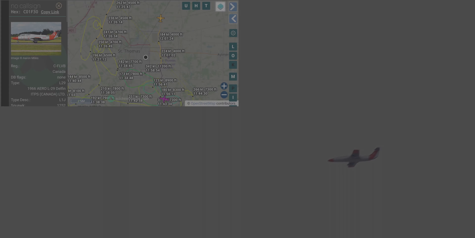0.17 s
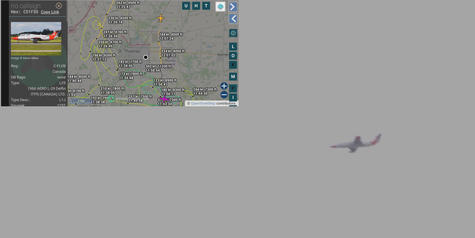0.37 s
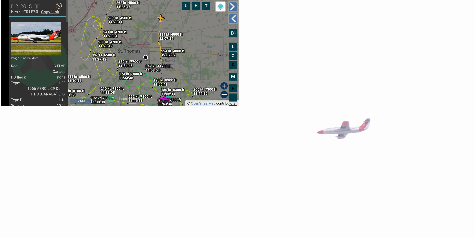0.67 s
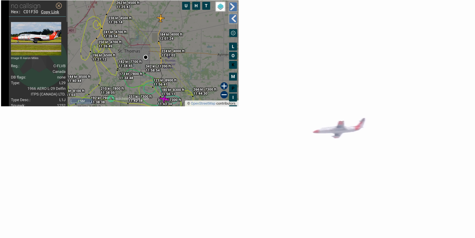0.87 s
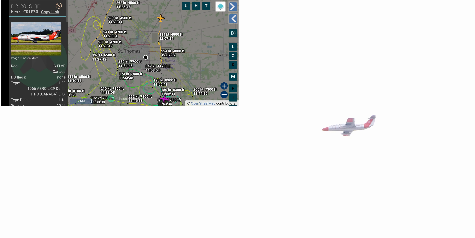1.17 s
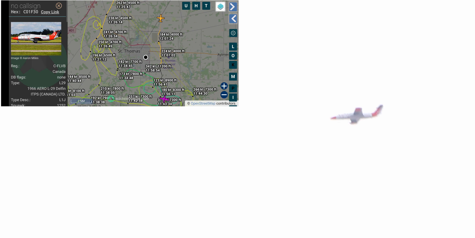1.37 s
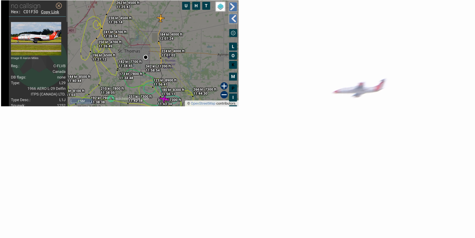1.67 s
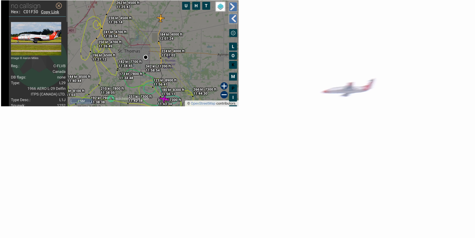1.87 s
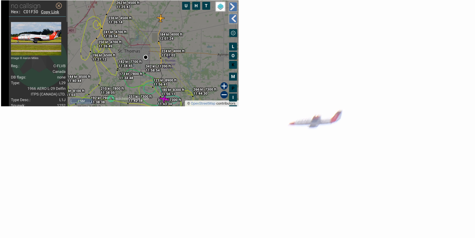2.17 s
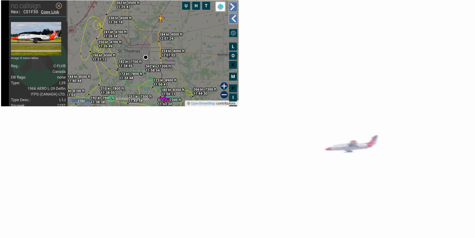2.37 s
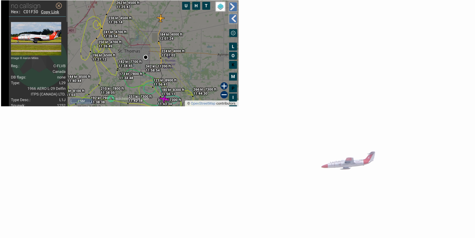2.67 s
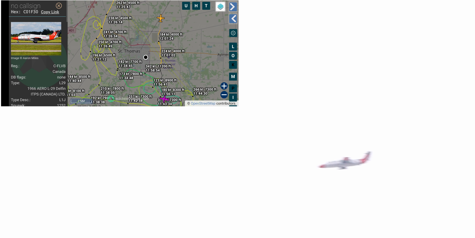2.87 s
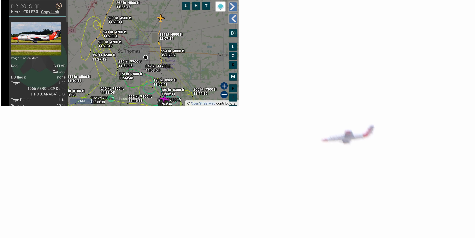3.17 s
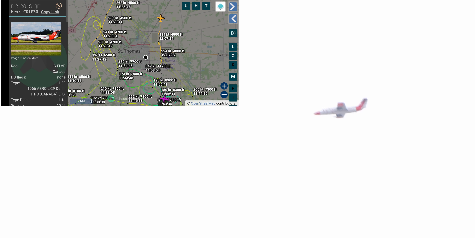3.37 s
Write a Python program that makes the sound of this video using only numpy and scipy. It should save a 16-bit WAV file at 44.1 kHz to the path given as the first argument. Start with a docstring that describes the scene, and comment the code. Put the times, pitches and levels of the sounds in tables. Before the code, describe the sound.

The low drone of a faraway propeller airliner fades in, its dull roar rolling through the open air over a light wind rumble. The hand-held camera ticks faintly up close, and a few faint high chirps sound in the distance.

```python
"""Outdoors, from the microphone of a hand-held camera. The sound fades in on a distant propeller
airliner: its blades drone, sinking slowly in pitch, over an exhaust and airframe roar that swells and
fades in the moving air. Light wind, hiss and a faint rustle lie beneath; whooshes roll through the roar.
From 0.4 s the camera's shell ticks faintly under the hand, right at the microphone. From 0.8 s a few
weak high chirps sound far off. Near the end the whooshes narrow into brief howls."""
import sys
import numpy as np
from scipy import signal
from scipy.io import wavfile
from scipy.ndimage import uniform_filter1d

SR = 44100
rng = np.random.default_rng(int(sys.argv[2]) if len(sys.argv) > 2 else 0)


def master_out(mix):
    """Clip the mix to full scale and print it as 16-bit PCM to the path in sys.argv[1]."""
    frames = np.transpose(np.atleast_2d(mix))
    ceiling = np.clip(frames, -1, 1)
    pcm = np.round(ceiling * 32767).astype(np.int16)
    wavfile.write(sys.argv[1], SR, pcm)


N = 155232
TIME = np.arange(N) / SR

# blade-passing rate as it reaches the microphone: (time [s], rate [Hz])
BLADE_RATE = [(0, 82.48), (.5, 81.72), (1.2, 81.77), (2.0, 80.3), (2.75, 80.2), (3.25, 79.05),
              (3.52, 79.65)]
# the blade tone and its second and third harmonics: (time [s], rms level [dB])
BLADE_LEVEL = [(.3, -20.5), (.82, -18.5), (.97, -20), (1.1, -18), (1.7, -18.5), (2.35, -17.5), (2.56, -18),
               (2.68, -21.5), (2.85, -20.5), (2.94, -19.5), (3.28, -21), (3.52, -22)]
SECOND_LEVEL = [(.3, -34), (.85, -34), (1.15, -29.5), (1.3, -28.5), (1.76, -26), (2.12, -27.5),
                (2.2, -32.5), (2.35, -32), (2.58, -32.5), (2.78, -28), (3.52, -29)]
THIRD_LEVEL = [(.3, -30.5), (.6, -28), (.88, -32), (1.0, -30), (1.32, -41), (1.6, -26), (1.95, -31.5),
               (2.2, -38.5), (2.349, -27), (2.8, -38.5), (3.0, -27), (3.27, -26), (3.52, -28)]
# propeller overtones: (multiple of the shaft rate, rms level before swell and fading [dB])
OVERTONES = [(13, -36), (15, -43.5), (16, -50.5), (20, -42), (31, -50.5), (33, -51), (35, -48.5), (48, -54)]
# swells in the moving air, from bass to top: (time [s], gain [dB])
BASS_SWELL = [(.3, -4), (.83, -1), (.92, 3), (1.12, 0.5), (1.78, 4), (1.97, 1), (2.15, 2), (2.35, -8),
              (2.7, 3.5), (3.0, -1), (3.5, 5.5)]
LOW_MID_SWELL = [(.25, -2), (.5, 5), (1.15, 3), (1.38, -2.5), (1.55, 5), (1.78, -3.5), (2.05, 3),
                 (2.25, -1), (2.47, 4), (2.62, -4.5), (2.9, 1.5), (3.17, 2), (3.4, 8), (3.52, 7)]
MID_SWELL = [(.3, 6.5), (.62, -1), (.92, 3), (1.3, 0), (1.55, 7), (1.66, 1), (1.89, 7.5), (2.1, -3.5),
             (2.47, 4.5), (2.66, 1), (2.84, 6), (3.1, 4), (3.52, 3)]
TOP_SWELL = [(.35, 1.5), (0.519, -0.5), (.68, 2), (.85, -0.5), (1.0, -3.5), (1.22, 2), (1.37, -1.5),
             (1.56, 1.5), (1.72, -1.5), (2.28, -2.5), (2.45, 5), (2.62, -3), (2.82, 2.5), (3.1, -2.5),
             (3.22, 4), (3.52, -3)]
# where each of the four swells acts most, then where swelling ends: (frequency [Hz])
SWELL_HZ = [175, 370, 680, 1050, 1900]
# spectra of the distant roar, the wind, the hiss and the rustle: (frequency [Hz], relative density [dB])
ROAR_SPECTRUM = [(70, -3.5), (110, -9.5), (145, 8.5), (190, 4.5), (235, -2.5), (290, -4), (390, 0),
                 (510, -11), (690, -11), (850, -13), (1050, -17), (1300, -24.5), (1650, -34), (2300, -43.5),
                 (4000, -65)]
WIND_SPECTRUM = [(15, -5), (28, -5.5), (48, 1.5), (70, -3.5), (120, -9.5), (400, -42.5)]
HISS_SPECTRUM = [(300, 10), (1400, 9), (2500, -0.5), (5000, 1), (7500, 2.5), (10000, 1.5), (16000, 1)]
RUSTLE_SPECTRUM = [(1200, -3), (1500, 2.5), (2200, -7), (2800, -7.5), (3600, -7), (4500, -13), (7000, -24)]
# slow rise and fall of the hiss: (time [s], gain [dB])
HISS_SWELL = [(.3, 1.5), (1.6, 0.5), (2.3, 0.5), (2.85, 2.5), (3.15, 1.5), (3.45, -0.5)]
# the rustle before its flicker: (time [s], level [dB])
RUSTLE_LEVEL = [(.3, -57.5), (.55, -57.5), (1.2, -58), (1.55, -58.5), (2.2, -60), (3.1, -58), (3.48, -63)]
# likeness of the microphone's left and right channels: (frequency [Hz], correlation [0-1])
LIKENESS = [(25, .7), (70, 1), (160, 0.98), (500, 0.95), (900, 0.94), (1400, 0.53), (1900, 0),
            (16000, 0.027)]
# whooshes and howls in the roar:
# (time [s], length [s], start pitch [Hz], end pitch [Hz], crest rms level [dB], width [share of pitch])
WHOOSHES = [(0.127, 0.326, 986, 1030, -39, 0.19), (0.199, 0.32, 729, 620, -33.5, 0.25),
            (0.778, 0.26, 428.2, 250.7, -25, 0.21), (0.889, .13, 189.1, 168.4, -26.5, 0.29),
            (1.116, 0.234, 1037, 971, -41.5, 0.14), (2.223, 0.37, 673, 665, -31.5, 0.2),
            (2.72, 0.25, 700.2, 607.6, -30, 0.26), (3.225, 0.18, 380, 364.6, -23, 0.064),
            (3.366, .13, 395.4, 401.6, -22, 0.064), (3.342, 0.23, 679.5, 731, -37, 0.028)]
# handling ticks: (time [s], level at the tilt pivot [dB], tilt [dB/octave], tail against crack [dB])
TICKS = [(.390, -56, -11, -4), (.639, -41.5, 4, -6.5), (.646, -44.5, -6, 0.5), (.779, -56, 0, -12),
         (1.112, -53.5, -9, -1), (1.300, -55.5, -11, -0.5), (1.483, -45, -7, -16), (1.743, -45, 0.5, -8.5),
         (1.748, -46, -10, -2.5), (2.018, -56.5, -9.5, 2), (2.207, -55, -9, -4.5), (2.363, -55, -12, -2),
         (2.457, -52, -4, -6.5), (2.573, -51, -5, -9), (2.725, -54, -12.5, -3.5), (3.008, -51, -10, 0),
         (3.059, -53.5, -12, -3.5), (3.216, -55.5, -7, -2)]
# broad spectrum of the camera's shell: (frequency [Hz], relative density [dB])
SHELL_SPECTRUM = [(900, -4), (1650, 8.5), (2600, -10), (3800, 4.5), (5200, 4), (6300, -0.5), (8000, -1),
                  (10000, -12), (11600, -7.5), (15000, -10)]
# the shell's resonances: (frequency [Hz], relative level [dB])
SHELL_MODES = [(1610, -12.5), (3450, -14.5), (4010, -12), (5060, -11), (6500, -13.5), (7260, -7.5),
               (8190, -8.5), (11400, -13)]
# far chirps: (time [s], length [s], pitch [Hz], crest rms level [dB], pure tone [share of power])
CHIRPS = [(0.823, 0.024, 1452, -40.5, 0.46), (.955, 0.026, 3540, -56.5, .4),
          (1.026, 0.024, 3500, -56, 0.38), (1.093, 0.027, 1463, -40, .7), (1.196, 0.086, 3450, -54.5, 0.03),
          (1.63, 0.055, 3350, -59, 0.1), (2.449, 0.026, 3090, -58.5, .7)]


def from_db(db):
    """Decibels to gain."""
    return 10 ** (np.asarray(db) / 20)


def rms_one(x):
    """Scale to rms 1."""
    return x / np.sqrt(np.mean(x ** 2) + 1e-20)


def in_time(rows):
    """Read (time, value) rows at every sample."""
    return np.interp(TIME, *np.transpose(rows))


def at_hz(points, hz):
    """Read a spectrum on a log-frequency axis."""
    f, value = np.transpose(points)
    return np.interp(np.log(hz), np.log(f), value)


def arch(start, length):
    """A half-sine rise and fall."""
    return np.sin(np.pi * np.clip((TIME - start) / length, 0, 1))


def drift(rate_hz):
    """A slow random wander with spread 1."""
    hop, settle = 100, 2000
    pole = np.exp(-2 * np.pi * hop * rate_hz / SR)
    white = rng.standard_normal(N // hop + settle + 2)
    slow = signal.lfilter([1], [1, -2 * pole, pole * pole], white)[settle:]
    return np.interp(np.arange(N) / hop, np.arange(len(slow)), rms_one(slow - slow.mean()))


def even(x, window_s=0.1):
    """Hold a noise's power steady, keeping its fast flutter."""
    power = np.mean(x ** 2, axis=0)
    local_power = np.abs(uniform_filter1d(power, int(window_s * SR)))
    return x * np.sqrt(power.mean() / (local_power + 1e-20))


def stereo(mid, side, alike):
    """Mix two noises into left and right with correlation `alike`."""
    return np.sqrt(1 + alike) * mid + np.sqrt(1 - alike) * side * [[1], [-1]]


def noise_bands(spectrum):
    """Third-octave bands of stereo noise, as (Hz, band), whose powers add up to 1."""
    edges = 16 * 2 ** (np.arange(31) / 3)
    centres = np.sqrt(edges[1:] * edges[:-1])
    inside = (centres > spectrum[0][0]) & (centres < spectrum[-1][0])
    gains = from_db(at_hz(spectrum, centres)) * np.sqrt(centres) * inside
    for hz, low, high, gain in zip(centres, edges, edges[1:], gains / np.linalg.norm(gains)):
        white = rng.standard_normal((2, N))
        if gain > 0:
            mid, side = signal.sosfilt(signal.butter(2, [low, high], "band", fs=SR, output="sos"), white)
            alike = min(at_hz(LIKENESS, hz), .998)
            yield hz, gain * rms_one(stereo(mid, side, alike))


def narrow_noise(hz, width_hz):
    """Stereo noise around a steady or gliding centre; rms 1."""
    hz = hz * np.ones(N)
    white = rng.standard_normal((2, N)) + 1j * rng.standard_normal((2, N))
    mid, side = signal.sosfilt(signal.butter(2, width_hz / 2, fs=SR, output="sos"), white)
    pair = stereo(mid, side, at_hz(LIKENESS, hz.mean()))
    carrier = np.exp(2j * np.pi * np.cumsum(hz) / SR)
    return rms_one(np.real(pair * carrier))


def air_swell_db(hz):
    """How moving air on the way to the microphone raises and lowers the aircraft at one frequency."""
    curves = BASS_SWELL, LOW_MID_SWELL, MID_SWELL, TOP_SWELL
    shares = [np.interp(np.log(hz), np.log(SWELL_HZ), row) for row in np.eye(len(SWELL_HZ))]
    return sum(share * in_time(curve) for share, curve in zip(shares, curves))


def propellers(blades=4, left_over_right_db=2.07, fading_db=3, waver_hz=1.81):
    """Far off, passing blades make a tone with two strong harmonics; overtones waver on the way down."""
    rate = in_time(BLADE_RATE)
    angle = 2 * np.pi * np.cumsum(rate) / SR
    pan = from_db(np.array([[1], [-1]]) * left_over_right_db / 2)
    out = from_db(in_time(BLADE_LEVEL)) * np.sin(angle) * pan
    partials = [(2, in_time(SECOND_LEVEL)), (3, in_time(THIRD_LEVEL))]
    for multiple, db in OVERTONES:
        ratio = multiple / blades
        partials.append((ratio, db + air_swell_db(ratio * rate.mean()) + fading_db * drift(waver_hz)))
    for ratio, level in partials:
        phase_wander = 0.32 * np.sqrt(ratio) * drift(waver_hz)
        out = out + from_db(level) * np.sin(ratio * angle + phase_wander + rng.uniform(0, 2 * np.pi))
    return np.sqrt(2) * out


def roar(base_db=-26.5, flicker_db=2, low_cut_hz=135.4):
    """Exhaust and airframe noise, dulled by distance, swelling and flickering band by band."""
    out = 0
    for hz, band in noise_bands(ROAR_SPECTRUM):
        level = base_db + air_swell_db(hz) + flicker_db * drift(rate_hz=11.1)
        out = out + even(band) * from_db(level)
    return signal.sosfilt(signal.butter(8, low_cut_hz, "high", fs=SR, output="sos"), out)


def wind(level_db=-31.5):
    """Light wind, a low steady rumble at the microphone."""
    return from_db(level_db) * sum(band for _, band in noise_bands(WIND_SPECTRUM))


def hiss(base_db=-59):
    """A wide, gently varying hiss in the background."""
    return from_db(base_db + in_time(HISS_SWELL)) * sum(band for _, band in noise_bands(HISS_SPECTRUM))


def rustle(flicker_db=2.5, flicker_hz=10):
    """A faint rustle in the open air, above the roar; its bands flicker both together and singly."""
    shared_db = in_time(RUSTLE_LEVEL) + flicker_db * drift(flicker_hz) / 2
    return sum(band * from_db(shared_db + flicker_db * drift(flicker_hz))
               for _, band in noise_bands(RUSTLE_SPECTRUM))


def whooshes():
    """For a moment one gliding band of the distant roar comes through strongly; the narrowest howl."""
    out = 0
    for start, length, start_hz, end_hz, db, width in WHOOSHES:
        glide = in_time([(start, start_hz), (start + length, end_hz)])
        band = even(narrow_noise(glide, width * (start_hz + end_hz) / 2))
        out = out + from_db(db) * arch(start, length) * band
    return out


def camera_ticks(attack_s=0.0009, crack_t60_s=0.029, tail_t60_s=0.29, tail_cut_hz=7000, pivot_hz=4000):
    """At the microphone the handled shell cracks; a duller tail is strong on knocks, weak on snaps."""
    out, age = np.zeros((2, N)), TIME[:SR // 4]
    rings = [(hz, from_db(db) * narrow_noise(hz, width_hz=210)) for hz, db in SHELL_MODES]
    attack = 1 - np.exp(-age / attack_s)
    crack = from_db(-60 * age / crack_t60_s)
    for hz, band in list(noise_bands(SHELL_SPECTRUM)) + rings:
        tail = from_db(-60 * age / tail_t60_s) / (1 + (hz / tail_cut_hz) ** 2)
        power = np.zeros(N + SR)
        for start, db, tilt_db, tail_db in TICKS:
            first = int(start * SR)
            envelope = attack * (crack + from_db(tail_db) * tail)
            gain = from_db(db + tilt_db * np.log2(hz / pivot_hz))
            power[first:first + len(age)] += (envelope * gain) ** 2
        out += band * np.sqrt(power[:N])
    return out


def chirps(width_share=0.12, echo_db=-4, echo_t60_s=0.29):
    """Short calls from far off, part pure tone and part narrow noise, each with a brief echo."""
    out = 0
    for start, length, hz, db, pure in CHIRPS:
        tone = np.sin(2 * np.pi * hz * TIME + rng.uniform(0, np.pi / 2, (2, 1)))
        call = np.sqrt(2 * pure) * tone + np.sqrt(1 - pure) * narrow_noise(hz, width_share * hz)
        age = np.maximum(TIME - start - length / 2, 0)  # the echo builds from the middle of the call
        echo_envelope = from_db(echo_db - 60 * age / echo_t60_s) * np.minimum(2 * age / length, 1)
        echo = echo_envelope * narrow_noise(hz, width_share * hz)
        out = out + from_db(db) * (arch(start, length) * call + echo)
    return out


def scene():
    """At the microphone: the distant aircraft, the open air, near ticks and far chirps."""
    return propellers() + roar() + wind() + hiss() + rustle() + whooshes() + camera_ticks() + chirps()


def record(dry):
    """The microphone's sound fades in, with the highest treble cut off."""
    fade_start_s, fade_end_s, cutoff_hz = 0.036, 0.34, 15800
    fade = np.clip((TIME - fade_start_s) / (fade_end_s - fade_start_s), 0, 1) ** 1.075
    return signal.sosfilt(signal.ellip(12, .1, 80, cutoff_hz, fs=SR, output="sos"), dry * fade)


dry = scene()
out = record(dry)
master_out(out)
```